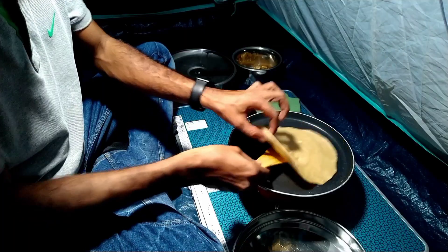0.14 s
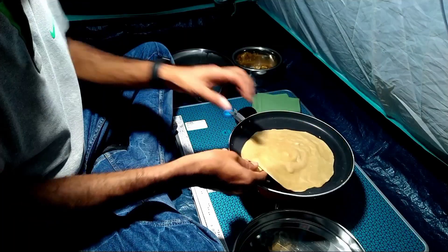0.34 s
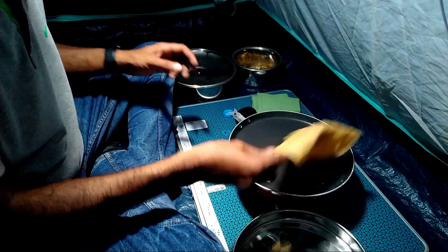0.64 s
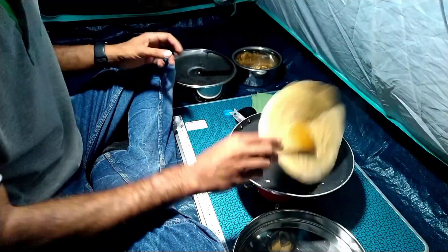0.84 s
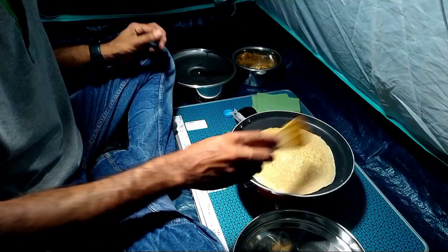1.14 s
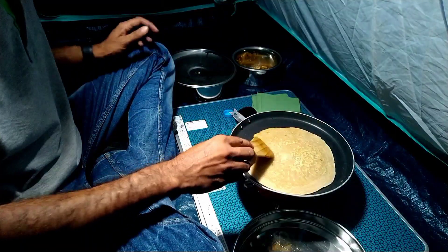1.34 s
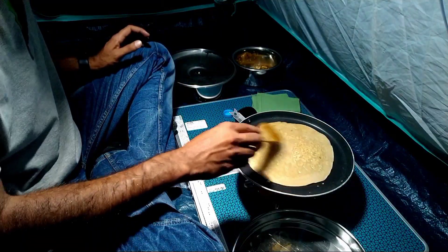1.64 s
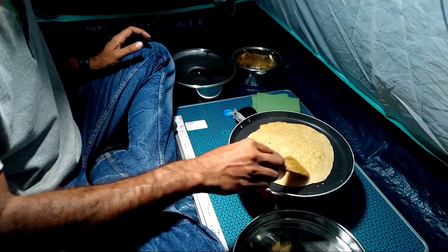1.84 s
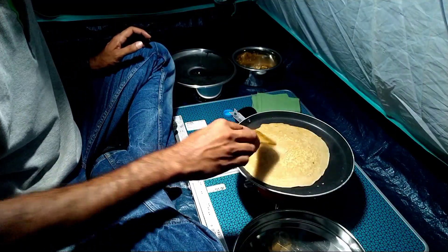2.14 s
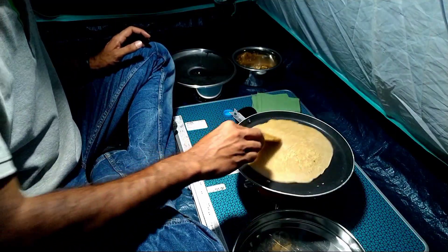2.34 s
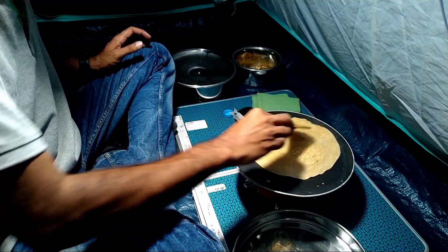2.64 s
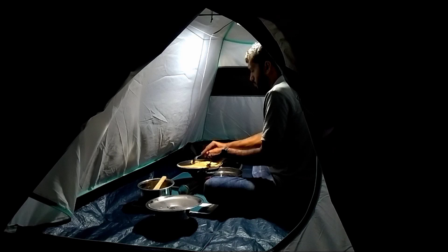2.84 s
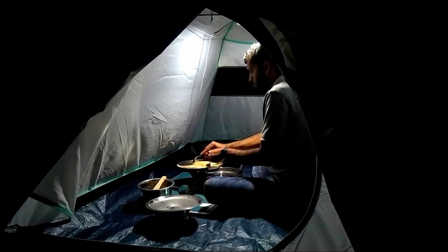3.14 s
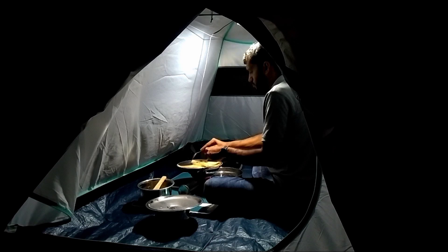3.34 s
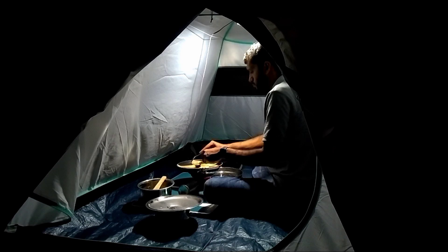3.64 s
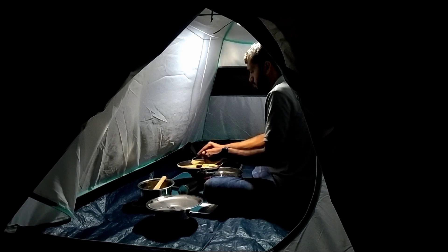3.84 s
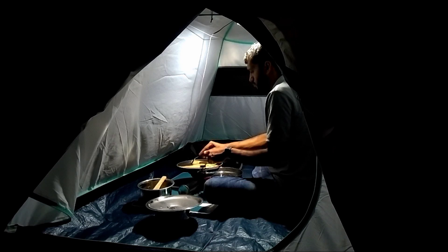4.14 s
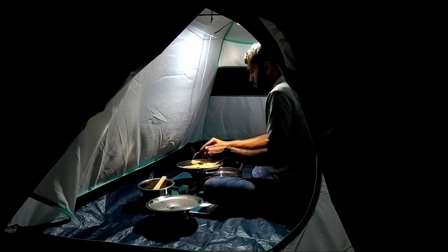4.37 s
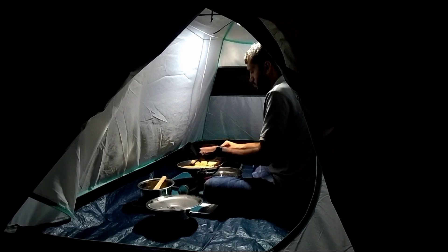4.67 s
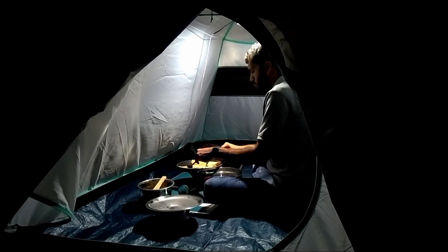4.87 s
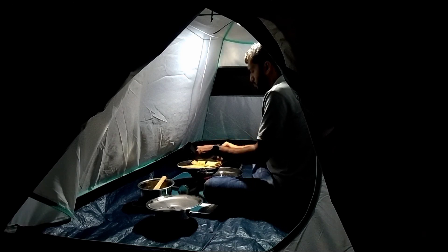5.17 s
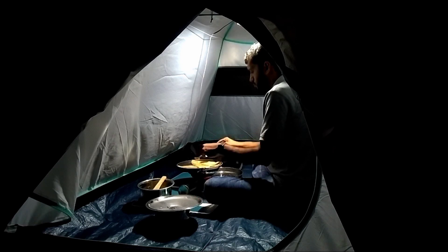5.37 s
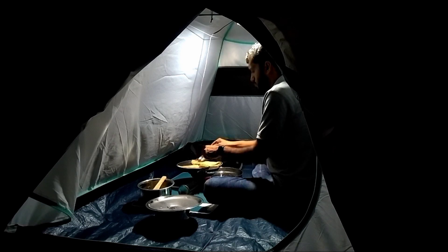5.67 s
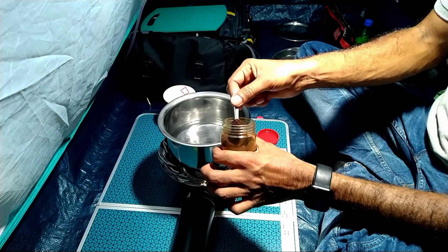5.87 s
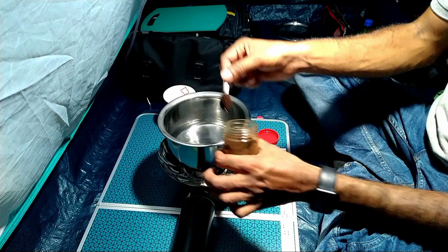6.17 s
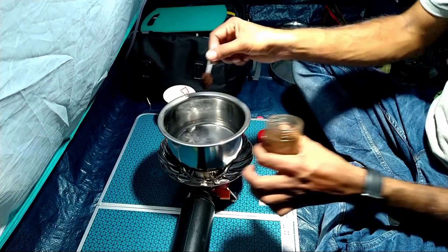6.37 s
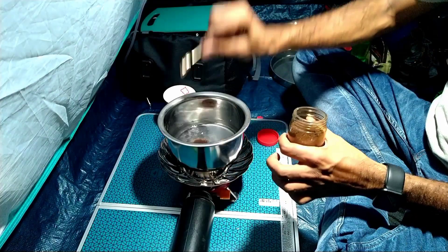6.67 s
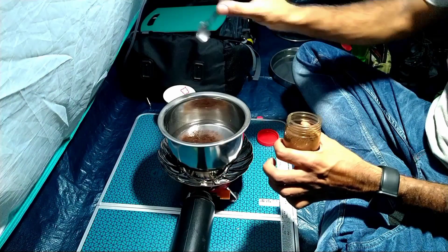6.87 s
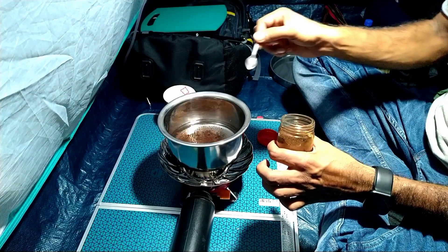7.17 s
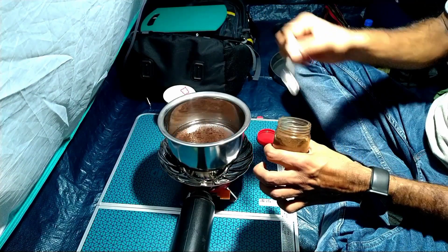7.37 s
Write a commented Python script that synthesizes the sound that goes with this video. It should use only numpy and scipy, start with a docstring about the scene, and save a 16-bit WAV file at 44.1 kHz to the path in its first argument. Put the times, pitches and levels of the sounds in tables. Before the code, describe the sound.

Night insects sing around a tent as someone cooks: light pan ticks, one sharp metallic knock, soft sizzle, then a close burner roar.

```python
"""Field crickets chirp, mostly in threes, near 4.3 kHz; a small cricket trills in pairs near 7 kHz: fluttering tones.
Behind them are a far chorus and other insects (shaped noise) and distant barking dogs (hoarse gliding tones).
Someone cooks in a tent: a spatula ticks on the pan (noise bursts) and knocks it once (cracks and ringing modes).
Frying and gas hiss; later a gas burner roars close by (noise) and its flame pops (pressure pulses)."""
import sys
import numpy as np
from scipy import signal
from scipy.fft import rfft, irfft
from scipy.io import wavfile

SR = 44100
rng = np.random.default_rng(int(sys.argv[2]) if len(sys.argv) > 2 else 0)


def int16_out(signal):
    """Quantize to a 16-bit WAV file."""
    q = np.round(np.clip(np.atleast_2d(signal).T, -1, 1) * 32767)
    wavfile.write(sys.argv[1], SR, q.astype(np.int16))


N = 331191

# noise spectra of flame roar, hiss and far chorus, relative: hz, density_db
ROAR_SPECTRUM = [(20, -8), (40, 0), (100, -1.5), (300, -3), (450, -8), (850, -13), (1600, -16), (3000, -23)]
HISS_SPECTRUM = [(500, -21), (1000, -13), (2500, 0.5), (5000, 3), (8500, 2.5), (11700, 1), (15500, 4)]
NIGHT_SPECTRUM = [(30, -22), (850, -37.5), (2500, -22.5), (4400, -21), (5600, -36), (6200, -2.5),
                  (7080, -3.5), (7700, -12), (8100, -25), (10000, -56), (14000, -16.5)]
# flame roar level, low and then close by: time_s, level_db
FLAME_LEVEL = [(0.0, -55), (0.23, -65.5), (1.3, -67), (5.79, -67), (5.94, -53.5), (7.51, -54)]
# frying and gas hiss level: time_s, level_db
FRYING_LEVEL = [(0.0, -41.5), (0.21, -46.5), (0.33, -52), (0.43, -43), (0.65, -54), (0.98, -57),
                (1.34, -47.5), (1.51, -53.5), (2.76, -52.5), (3.74, -61), (4.22, -56), (4.58, -58.5),
                (5.79, -57), (6.04, -50), (6.63, -45.5), (6.76, -49.5), (7.51, -50.5)]
# other far insects, narrow bands: centre_hz, width_hz, throb_db, usual_level_db
FAR_INSECTS = [(3260, 200, 1.5, -83), (4930, 340, 2, -70), (5640, 180, 2, -72), (8200, 380, 4, -63),
               (9170, 450, 4, -68.5), (4350, 800, 3, -65)]
# louder song, one list per far insect: start_s, end_s, louder_db
BOUTS = [
    [(.65, .73, 21), (1.75, 1.87, 19.5), (2.72, 2.82, 12), (3.85, 3.98, 21), (5.23, 5.31, 15),
     (6.36, 6.5, 17.5), (7.39, 7.51, 21.5)],
    [(0.0, .2, 4), (1.6, 1.8, 10), (1.93, 1.97, 15.5), (2.2, 2.33, 12.5), (2.4, 2.5, 12.5),
     (2.62, 2.72, 12), (2.87, 2.97, 12), (3.09, 3.18, 12), (3.43, 3.5, 10), (3.68, 3.76, 12),
     (5.31, 5.37, 8), (6.0, 6.05, 5), (6.2, 6.3, 11), (6.47, 6.57, 13), (6.98, 7.05, 11.5), (7.22, 7.27, 5)],
    [(1.4, 1.62, 11.5), (1.74, 1.8, 15), (3.1, 3.16, 10)],
    [(2.25, 2.38, 3), (2.57, 2.69, 3), (2.88, 2.96, 7.5), (3.18, 3.42, 4), (3.62, 3.82, 4),
     (4.06, 4.14, 7.5), (4.3, 4.55, 4.5), (5.36, 5.4, 6.5), (6.3, 6.65, 5)],
    [(0.0, 0.48, 9), (3.2, 3.33, 1), (6.45, 6.62, 9)],
    [(2.8, 2.86, 8), (3.03, 3.07, 5), (3.14, 3.18, 16), (3.35, 3.41, 10), (3.58, 3.65, 13),
     (7.11, 7.2, 10.5), (7.33, 7.43, 9)],
]
# small cricket's wandering beat, pulses even between rows: pulse_number, time_s
BEAT = [(0, .0025), (11, .7046), (19, 1.2143), (20, 1.304), (23, 1.4995), (29, 1.8797), (34, 2.1997),
        (42, 2.7082), (48, 3.095), (51, 3.2837), (68, 4.3716), (71, 4.565), (82, 5.269), (89, 5.7132),
        (90, 5.7812), (95, 6.1056), (101, 6.487), (105, 6.745), (110, 7.0624), (113, 7.2547), (116, 7.4433)]
# field cricket chirps: start_s, strokes, level_db, singer (0 ahead, 1 near left, 2 farther left)
CHIRPS = [(0.0293, 2, -31.5, 0), (0.1495, 3, -28.8, 1), (0.2295, 3, -31, 0), (0.4179, 3, -27.2, 1),
          (0.4598, 3, -31.3, 0), (0.6875, 3, -30, 0), (0.9397, 3, -30.3, 0), (1.1678, 2, -29.5, 0),
          (1.2348, 3, -30.7, 0), (1.4665, 3, -30.7, 0), (1.7268, 3, -31, 0), (1.9877, 2, -31.3, 0),
          (2.7268, 2, -31, 0), (2.8795, 2, -34, 2), (2.9297, 3, -30, 0), (3.083, 2, -35, 2),
          (3.1918, 3, -30.7, 0), (3.316, 1, -30.5, 2), (3.4953, 3, -35.5, 2), (3.762, 2, -35.5, 2),
          (3.914, 2, -31, 0), (4.115, 3, -30, 0), (4.3469, 3, -30.8, 0), (4.5783, 3, -30.2, 0),
          (4.8096, 3, -30.1, 0), (4.995, 2, -30, 1), (5.0399, 3, -31.2, 0), (5.2061, 3, -29, 1),
          (5.4462, 3, -28, 1), (5.6853, 3, -27.9, 1), (5.9234, 3, -27.8, 1), (6.313, 2, -30.2, 0),
          (6.5138, 3, -30.6, 0), (6.7451, 3, -31.5, 0), (6.9755, 3, -31.5, 0), (7.2047, 3, -30.8, 0),
          (7.4345, 3, -32.2, 0)]
# spatula ticks on the pan: time_s, level_db, low_part_db, left_minus_right_db
TICKS = [(0.184, -29, -29, -6), (0.4245, -22.5, -22, -2), (0.593, -31.5, -43, -3), (0.966, -44.5, -22, 6),
         (1.3637, -41, -14, 3), (1.7654, -36.5, -20, 1), (2.1535, -58, -5, 0), (2.274, -29, -22, -5),
         (2.345, -33, -29, 1.5), (2.448, -44, -28, 2), (2.5, -35.5, -32, 1), (2.633, -31, -34, 4),
         (2.6902, -35.5, -22, -1), (2.814, -43.5, -23, 8), (3.0806, -57, 13, -1.5), (6.8883, -28, -32, -6)]
# flame pops and soft bumps: time_s, relative_level_db
POPS = [(0.204, -43.5), (5.878, -44.5), (5.89, -37.5), (5.974, -36), (6.2229, -31.5), (6.292, -41),
        (6.4525, -32), (6.467, -35), (6.6673, -33), (6.7408, -35.5), (6.8387, -33), (6.9569, -33),
        (7.385, -35)]
# brief ring of the pot on the burner, relative to the pop: hz, level_db, t60_s
POT_MODES = [(729, -18.5, 0.047), (1330, -25.5, 0.038)]
# contacts of the one knock on the pan: time_s, relative_strength_db
KNOCK = [(1.2351, -27.5), (1.237, -33), (1.238, -8), (1.2402, -33), (1.2428, -31), (1.2457, -26)]
# modes of the pan: hz, relative_level_db, t60_s, left_minus_right_db
PAN_MODES = [(151.3, -1.5, 0.014, 1.5), (311.7, -11.5, 0.077, -4), (469.4, -10, 0.077, -0.5),
             (754, -14.5, 0.0824, -4), (1264, 3, 0.025, -19.5), (1352, -1.5, 0.039, -10),
             (1587, 1.5, 0.062, 2), (1656, -2.5, 0.061, 6), (1870, -1.5, 0.041, 22), (2110, -10, 0.083, 1),
             (2556, -2, 0.054, -12), (2930, -17, 0.095, -1), (3562, -3.5, 0.099, -4.5),
             (4570, -10, 0.079, 1), (4910, -2, 0.047, -0.5), (6660, -2, 0.033, -10),
             (8000, -10.5, 0.015, -15.5), (10120, 7.5, 0.017, -6), (12210, -16, .025, -7.5)]
# distant barks, levels before BARK_DB: start_s, crest_s, end_s, fade_db_per_s,
# opening_db, crest_db, opening_hz, crest_hz, end_hz, hoarse_power_share
BARKS = [(1.983, 1.99, 2.03, 302, -67, -66, 1030, 990, 990, .4),
         (2.33, 2.358, 2.46, 500, -64, -52, 993, 1050, 1040, 0.3),
         (3.882, 3.948, 3.9, 300, -62.5, -56, 956, 1028, 1030, 0.8),
         (4.193, 4.253, 4.3, 200, -56, -58.5, 916, 1000, 1020, 0.6),
         (4.5, 4.585, 4.62, 150, -57.5, -56, 943, 985, 990, 0.8),
         (4.811, 4.89, 5.22, 76, -57.5, -53, 980, 1017, 1036, 0.56),
         (5.161, 5.24, 5.28, 200, -55, -52.5, 966, 990, 990, .8),
         (5.338, 5.385, 5.7, 140, -49, -46, 1088, 1073, 1020, 0.45),
         (5.77, 5.816, 5.97, 113, -47, -42.5, 1052, 1080, 1047, 0.6),
         (6.17, 6.214, 6.5, 73, -45, -44.5, 1050, 1078, 1042, 0.45)]

NIGHT_DB = -51
BOUT_SWELL_S, WANDER_DB = 0.05, 2.0
DIP_S, DIP_LENGTH_S, DIP_DB = 1.207, .028, -16  # brief dip in level before the knock
BUMP_DB, BUMP_DECAY_S = -40.5, 0.038
PAIR_GAP_S, PULSE_DB, PULSE_SPREAD_DB = .01805, -38.8, .7
SECOND_STROKE_S, STROKE_GAP_S = .0306, .0317  # ahead: first to second stroke, then stroke to stroke
LEFT_GAP_S = .0325
STROKE_SPREAD_DB, SECOND_HARMONIC_DB = 1.0, -23.5
ROUGH, ROUGH_S = .24, .002  # random roughness of the stroke: flutter depth and grain
ECHOES_PER_S = 700  # mean density of separate reflections
THUD_S, THUD_DB = 0.55, -56.5
BARK_ATTACK_S, BARK_DIP_DB_PER_S, BARK_RELEASE_S = 0.018, 54, 0.023
BARK_DB = -0.5  # overall bark level
CUTOFF_HZ = 15900


def from_db(db):
    """Decibels to amplitude ratio."""
    return 10 ** (np.asarray(db) / 20)


def rms_one(x):
    """Scale to unit rms."""
    return x / np.sqrt(np.mean(x ** 2) + 1e-20)


def sides(pan_db):
    """Left gain 1, right gain lower by pan_db."""
    return np.array([[1], [from_db(-pan_db)]])


def add(out, s, sound):
    """Mix a stereo sound in at s seconds."""
    i = max(round(s * SR), 0)
    out[:, i:i + sound.shape[1]] += sound[:, :N - i]


def bandpass(order, low_hz, high_hz, x):
    """Butterworth band filter."""
    return signal.sosfilt(signal.butter(order, [low_hz, high_hz], "band", fs=SR, output="sos"), x)


def drift(rate_hz):
    """Slow random wander for each ear, rms 1: noise through two equal one-pole lowpasses."""
    r = np.exp(-2 * np.pi * rate_hz / SR)
    noise = rng.standard_normal((2, N + SR))
    return rms_one(signal.lfilter([1], [1, -2 * r, r * r], noise)[:, SR:])  # skip the settling second


def coloured(spectrum, alike, flicker_db, rate_hz):
    """Flickering stereo noise of a given spectrum and left-right correlation, rms 1."""
    hz, level_db = np.transpose(spectrum)
    bins_hz = np.fft.rfftfreq(N, 1 / SR)
    gain = from_db(np.interp(np.log(bins_hz + 1), np.log(hz), level_db))
    mid, side = irfft(rfft(rng.standard_normal((2, N))) * gain, N)
    stereo = np.sqrt(1 + alike) * mid + np.sqrt(1 - alike) * side * [[1], [-1]]
    return rms_one(stereo * from_db(flicker_db * drift(rate_hz)))


def scattered(dry, t60_s, start_s, build_s):
    """Echoes from grass, trees and canvas: sparse reflections that build up and die, separate in each ear."""
    t = np.arange(round(t60_s * SR)) / SR
    strength = rng.standard_normal((2, len(t)))
    present = rng.random((2, len(t))) < ECHOES_PER_S / SR
    tail = strength * present * from_db(-60 * t / t60_s) * (1 - np.exp(-t / build_s))
    tail = tail / np.sqrt(np.sum(tail ** 2, axis=1, keepdims=True))
    tail = np.pad(tail, ((0, 0), (round(start_s * SR), 0)))
    return signal.fftconvolve(dry, tail, axes=1)[:, :N]


def burst(decay_s, low_hz, high_hz, alike):
    """A crack: band noise that dies away exponentially; peak near 1."""
    t = np.arange(round(12 * decay_s * SR)) / SR
    own = rng.standard_normal((2, len(t))) * np.sqrt(1 - alike)
    shared = rng.standard_normal(len(t)) * np.sqrt(alike)
    return rms_one(bandpass(2, low_hz, high_hz, own + shared)) * np.exp(-t / decay_s) / 2


def flame_roar():
    """Burner flame: low-pitched noise, weak and then close by."""
    level_db = np.interp(np.arange(N) / SR, *np.transpose(FLAME_LEVEL))
    return from_db(level_db) * coloured(ROAR_SPECTRUM, alike=0.105, flicker_db=2.0, rate_hz=28.0)


def frying_hiss():
    """Frying and gas: bright noise of changing level."""
    level_db = np.interp(np.arange(N) / SR, *np.transpose(FRYING_LEVEL))
    return from_db(level_db) * coloured(HISS_SPECTRUM, alike=.05, flicker_db=.6, rate_hz=30.0)


def night_chorus():
    """Far insect chorus over the night air: flickering noise, strongest at 6-7 kHz."""
    return from_db(NIGHT_DB) * coloured(NIGHT_SPECTRUM, alike=0.032, flicker_db=3.5, rate_hz=24.0)


def far_insects():
    """Narrow bands of noise that throb, wander in level and swell into louder bouts."""
    out, t = 0, np.arange(N) / SR
    throb, wander = drift(18.7), drift(4.06)[0]
    for k, (hz, width_hz, throb_db, level_db) in enumerate(FAR_INSECTS):
        noise = rng.standard_normal((2, N))
        song = rms_one(bandpass(3, hz - width_hz / 2, hz + width_hz / 2, noise))
        for start_s, end_s, louder_db in BOUTS[k]:
            inside_s = np.minimum(t - start_s, end_s - t)
            level_db = level_db + louder_db * np.clip(inside_s / BOUT_SWELL_S + 1, 0, 1)
        level_db = level_db + WANDER_DB * np.roll(wander, k * SR)
        out = out + song * from_db(level_db + throb_db * np.roll(throb, k * SR // 2, axis=1))
    return out


def opening_bump():
    """A soft low bump dying away at the start: low band noise."""
    out = np.zeros((2, N))
    add(out, 0, from_db(BUMP_DB) * burst(BUMP_DECAY_S, low_hz=140, high_hz=425, alike=0.76))
    return out


def stroke(length_s, top_hz, fall_hz, lag_s, lean, second_db=-60, third_db=-60):
    """Wing closure: fluttering tone, broken overtones, falling as the scraper slows; own delay and swell per ear."""
    t = np.arange(round(length_s * SR) + 40) / SR - np.array([[0], [lag_s]])
    u = np.clip(t / length_s, 0, 1)
    top_hz = top_hz * rng.normal(1, .005)
    fall_hz = fall_hz * rng.normal(1, .05)
    cycles = top_hz * t - fall_hz * length_s * u ** 2.15 / 2.15
    phase = 2 * np.pi * cycles + rng.uniform(0, 2 * np.pi)
    chance, steps = rng.standard_normal((2, 60)), np.arange(60)
    flutter = np.interp(t / ROUGH_S, steps, chance[0])
    broken = np.interp(t / .00045, steps, chance[1])
    overtones = from_db(second_db) * np.sin(2 * phase) + from_db(third_db) * np.sin(3 * phase)
    tone = (1 + ROUGH * flutter) * np.sin(phase) + broken * overtones
    swell = np.sin(np.pi * u ** np.array(lean)[:, None]) ** 1.3
    return swell * tone


def small_cricket():
    """Two quick strokes to a pulse, the second a little longer, each varying in strength."""
    out = np.zeros((2, N))
    number, at_s = np.transpose(BEAT)
    for s in np.interp(np.arange(number[-1] + 1), number, at_s):
        pulse_db = rng.normal(PULSE_DB, PULSE_SPREAD_DB)
        for late_s, length_s in ((0, .013), (PAIR_GAP_S, .0145)):
            sound = stroke(length_s, 7580, 1380, -.000136, [1.0, .8])
            level_db = pulse_db + rng.normal(0, .8)
            add(out, s + late_s, from_db(level_db) * from_db([[-1.2], [0]]) * sound)
    return out + from_db(-.5) * scattered(out, .35, .002, .004)


def field_cricket(singer, pan_db, second_s, gap_s, first_db, top_hz, fall_hz, lag_s, lean, lead_in_db, third_db):
    """One singer: a weak, short, low lead-in stroke, a softer first full stroke, then the rest."""
    out = np.zeros((2, N))
    for start_s, strokes, level_db, who in CHIRPS:
        if who != singer:
            continue
        gain = from_db(level_db) * sides(pan_db)
        if start_s > .03:  # room for the lead-in
            lead_in = stroke(0.013, top_hz - 420, fall_hz * .5, lag_s, lean)
            add(out, start_s - .028, gain * from_db(first_db + lead_in_db) * lead_in)
        for k in range(strokes):
            s, soft_db = start_s, first_db
            if k > 0:
                s, soft_db = start_s + second_s + (k - 1) * gap_s, 0
            spread = from_db(rng.normal(0, STROKE_SPREAD_DB, (2, 1)))
            sound = stroke(.023, top_hz, fall_hz, lag_s, lean, SECOND_HARMONIC_DB, third_db)
            add(out, s, gain * from_db(soft_db) * spread * sound)
    return out


def field_crickets():
    """Three singers, told apart by side, loudness and echo."""
    ahead = field_cricket(0, 1.6, SECOND_STROKE_S, STROKE_GAP_S, -3.2, 4850, 1090,
                          .00032, [.66, .9], lead_in_db=-12, third_db=-32)
    left = field_cricket(1, 9.2, LEFT_GAP_S, LEFT_GAP_S, -1.6, 4780, 1000,
                         -.00005, [.8, .75], lead_in_db=-9, third_db=-21)
    far = field_cricket(2, 8.5, STROKE_GAP_S, LEFT_GAP_S, -3.2, 4780, 1000,
                        -.00005, [.8, .8], lead_in_db=-9, third_db=-24)
    ahead_echo = from_db([[-5], [-7.5]]) * scattered(ahead, .36, .002, .012)
    left_echo = from_db([[-5.5], [1]]) * scattered(left, .32, .003, .02)
    far_echo = from_db([[-1], [5.5]]) * scattered(far, .4, .006, .04)
    return ahead + ahead_echo + left + left_echo + far + far_echo


def spatula_ticks():
    """Light contacts with the pan: a short bright crack over a longer low one."""
    out = np.zeros((2, N))
    for s, level_db, low_db, pan_db in TICKS:
        gain = from_db(level_db + pan_db / 2) * sides(pan_db)
        bright = burst(0.004, low_hz=7000, high_hz=18100, alike=0.042)
        add(out, s, from_db([[2], [-2]]) * gain * bright)
        add(out, s, gain * from_db(low_db) * burst(0.014, low_hz=1050, high_hz=4700, alike=0.14))
    return out


def flame_pops():
    """A short suck of air at the microphone, its rebound and a brief ring of the pot."""
    out, t = np.zeros((2, N)), np.arange(-200, 3000) / SR
    suck = -np.exp(-(t / 0.00071) ** 2)
    rebound = 0.46 * np.exp(-((t - .002) / 0.00094) ** 2)
    before = 0.4 * np.exp(-((t + 0.0015) / 0.00052) ** 2)
    shape = suck + rebound + before
    for hz, level_db, t60_s in POT_MODES:
        shape = shape + (t > 0) * from_db(level_db - 60 * t / t60_s) * np.sin(2 * np.pi * hz * t)
    for s, level_db in POPS:
        add(out, s + 0.00122 + t[0], from_db(level_db + 1.5) * shape * np.ones((2, 1)))
    return out


def pan_thud():
    """A soft, low thud of the pan on the stove."""
    out = np.zeros((2, N))
    add(out, THUD_S, from_db(THUD_DB) * burst(.05, low_hz=90, high_hz=150, alike=0.98))
    return out


def pan_rings(push):
    """Two-pole resonators as the pan's modes, each radiating to its own side."""
    out = 0
    for hz, level_db, t60_s, pan_db in PAN_MODES:
        r, w = from_db(-60 / (t60_s * SR)), 2 * np.pi * hz / SR
        ring = signal.lfilter([.5, 0, -.5], [1, -2 * r * np.cos(w), r * r], push + 1e-18)
        out = out + from_db(level_db + pan_db / 2) * sides(pan_db) * ring
    return out


def pan_knock():
    """Contacts crack and drive the pan's modes; a dull rattle on the stove follows."""
    out, push = np.zeros((2, N)), np.zeros((2, SR // 2))
    first_s, main_s = KNOCK[0][0], KNOCK[2][0]
    for s, strength_db in KNOCK:
        crack = burst(0.00055, low_hz=1500, high_hz=11750, alike=0.11)
        add(out, s, from_db(strength_db - 16) * crack)
        add(push, s - first_s, -from_db(strength_db - 19.5) * np.ones((2, 1)))
    add(out, main_s, from_db(-13.5) * burst(0.015, low_hz=990, high_hz=12700, alike=0.056))
    bright = burst(0.0012, low_hz=9170, high_hz=15300, alike=0.078)
    add(out, main_s, from_db(-6.0) * sides(11.0) * bright)
    # dull rattle
    add(out, first_s + .025, from_db(-38.5) * burst(0.036, low_hz=300, high_hz=790, alike=0.85))
    add(out, first_s + .04, from_db(-43) * burst(.045, low_hz=210, high_hz=460, alike=.9))
    add(out, first_s, pan_rings(push))
    return out


def dogs():
    """Barks open, sag, crest, fade and stop; distance leaves the throat resonance, a hoarse tone with echo."""
    t, out = np.arange(N) / SR, np.zeros(N)
    lowpass = signal.butter(4, 85, fs=SR, output="sos")
    hoarse = signal.sosfilt(lowpass, rng.standard_normal((2, N)))
    wavering = rms_one(hoarse[0]) + 1j * rms_one(hoarse[1])
    for start_s, crest_s, end_s, fade_db, open_db, crest_db, open_hz, crest_hz, end_hz, share in BARKS:
        half_s = (crest_s - start_s) / 2
        sag_s = start_s + half_s
        sag_db = min(open_db, crest_db) - BARK_DIP_DB_PER_S * half_s
        end_db = crest_db - fade_db * (end_s - crest_s)
        times_s = [start_s - BARK_ATTACK_S, start_s, sag_s, crest_s, end_s, end_s + BARK_RELEASE_S]
        levels_db = [open_db - 20, open_db, sag_db, crest_db, end_db, end_db - 20]
        level_db = np.interp(t, times_s, levels_db, -200, -200)
        hz = np.interp(t, [sag_s, crest_s, end_s], [open_hz, crest_hz, end_hz])
        carrier = np.exp(2j * np.pi * np.cumsum(hz) / SR)
        voice = np.sqrt(1 - share) + np.sqrt(share / 2) * wavering
        out += from_db(level_db + BARK_DB) * np.real(voice * carrier)
    ears = np.array([out, .7 * np.roll(out, 19)])  # left ear first, by 19 samples
    return ears + 0.46 * scattered(ears, 0.16, 0.002103, 0.0024)


def scene():
    """Insects, briefly turned down, plus stove, pan and dogs."""
    t = np.arange(N) / SR
    dipped = (t > DIP_S) & (t < DIP_S + DIP_LENGTH_S)
    insects = night_chorus() + far_insects() + small_cricket() + field_crickets()
    stove = flame_roar() + frying_hiss() + flame_pops()
    pan = spatula_ticks() + pan_thud() + pan_knock()
    return from_db(DIP_DB * dipped) * insects + opening_bump() + stove + pan + dogs()


def record(dry):
    """The range above 12 kHz is lower by a step; the top is cut steeply."""
    below = signal.sosfiltfilt(signal.cheby2(24, 40, 12250, fs=SR, output="sos"), dry)
    heard = below + from_db(-11) * (dry - below)
    return signal.sosfilt(signal.cheby2(24, 75, CUTOFF_HZ, fs=SR, output="sos"), heard)


dry = scene()
out = record(dry)
int16_out(out)
```